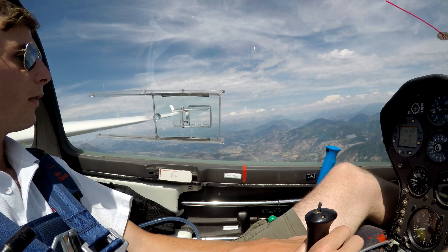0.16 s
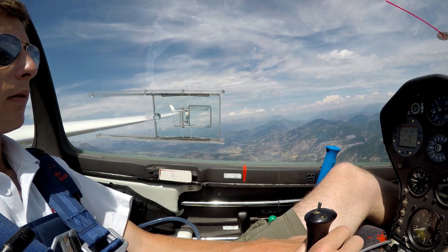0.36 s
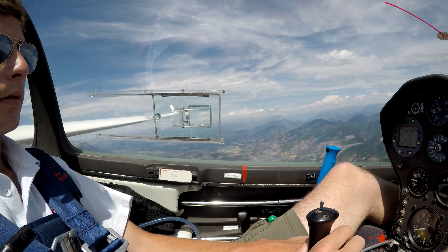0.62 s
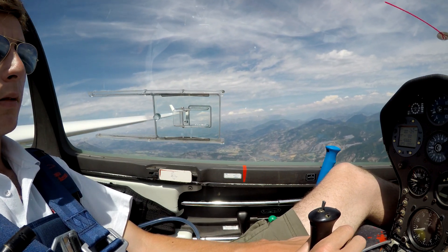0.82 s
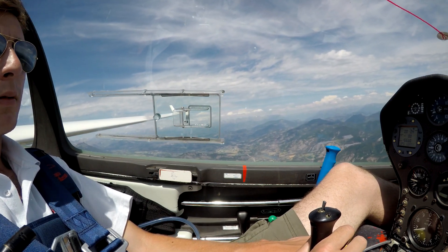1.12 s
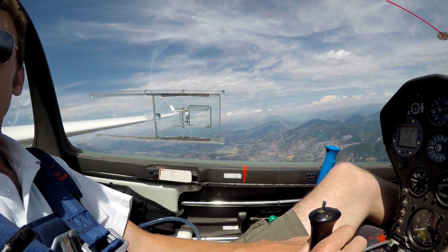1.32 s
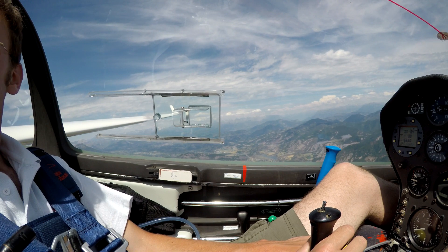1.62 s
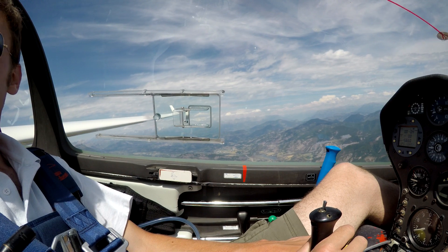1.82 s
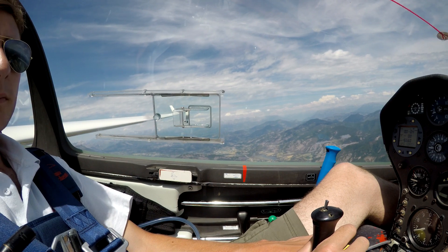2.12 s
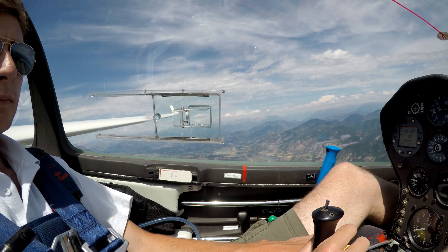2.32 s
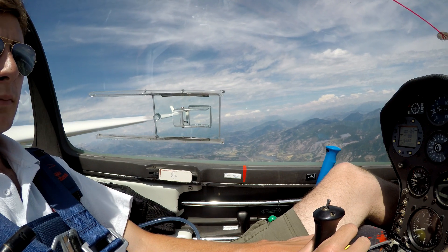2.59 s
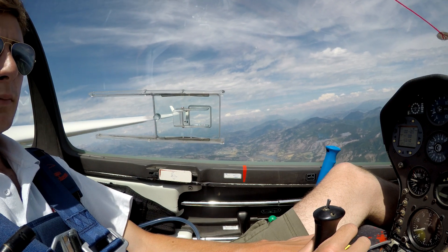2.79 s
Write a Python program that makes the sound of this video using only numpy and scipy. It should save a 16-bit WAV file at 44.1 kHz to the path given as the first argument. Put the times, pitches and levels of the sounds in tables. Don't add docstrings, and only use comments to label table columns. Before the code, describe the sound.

Deep, uneven wind rumble fills a glider cockpit in flight, with a softer airy roar and faint high hiss beneath; dull loose knocks come mostly early, then sporadically, heard close through a small enclosed microphone.

```python
import sys
import numpy as np
from scipy import signal
from scipy.io import wavfile
from scipy.ndimage import uniform_filter1d

SR = 44100
rng = np.random.default_rng(int(sys.argv[2]) if len(sys.argv) > 2 else 0)


def how_loud(loudness_db):
    steps = np.asarray(loudness_db, float) / 20
    return 10 ** steps


def wrap_up_sound(samples):
    columns = np.atleast_2d(samples).T
    tamed = np.clip(columns, -1, 1)
    steps = np.round(tamed * 32767).astype(np.int16)
    wavfile.write(sys.argv[1], SR, steps)


N = 130095

# time in seconds, level in dB.
FLOW_STRENGTH = [(0.0, -41.5), (0.73, -40), (2.09, -42), (2.56, -40.5), (2.95, -40)]
CONTACT_RISE_S = .0024


def rms_one(x):
    return x / np.sqrt(np.mean(x ** 2) + 1e-20)


def in_time(rows):
    return np.interp(np.arange(N) / SR, *np.transpose(rows))


def drift(rate_hz):
    hop = 40
    settle = 2000
    pole = np.exp(-2 * np.pi * rate_hz * hop / SR)
    white = rng.standard_normal(N // hop + 2 + settle)
    slow = signal.lfilter([1], [1, -2 * pole, pole * pole], white)[settle:]
    return np.interp(np.arange(N) / hop, np.arange(len(slow)), rms_one(slow - slow.mean()))


def band(x, low_hz, high_hz):
    return signal.sosfilt(signal.butter(2, [low_hz, high_hz], "band", fs=SR, output="sos"), x)


def turbulence(colour, shared_db, own_db, rate_hz):
    hz, db = np.transpose(colour)
    edges = 12 * 2 ** np.arange(0, 10.6, .25)
    white = rng.standard_normal((2, N + SR))
    together = drift(rate_hz)
    out = 0
    for k, (low, high) in enumerate(zip(edges, edges[1:])):
        mid = np.sqrt(low * high)
        if hz[0] / 1.2 < mid < hz[-1] * 1.2:
            colour_db = np.interp(np.log(mid), np.log(hz), db)
            gain_db = colour_db + shared_db * together + own_db * drift(rate_hz)
            out = out + how_loud(gain_db) * band(white[k % 2], low, high)[SR:]
    return rms_one(out)


def evened(x):
    return rms_one(x / np.sqrt(uniform_filter1d(x ** 2, size=3000) + 0.47))


def buffet():
    # time in seconds, level in dB.
    strength = [(0.0, -25), (0.13, -21.5), (0.19, -35), (0.22, -23), (0.29, -39), (0.44, -22.5),
                (0.97, -27.5), (1.01, -23), (1.95, -27), (2.0, -26), (2.06, -27), (2.3, -23), (2.34, -24),
                (2.37, -22), (2.46, -32.5), (2.49, -23), (2.91, -27), (2.95, -27)]
    # frequency in Hz, density in dB per Hz.
    colour = [(12, -4), (20, -4.5), (28, -2.5), (45, 0.5), (65, -5.5), (85, -15.5), (110, -33)]
    noise = evened(turbulence(colour, shared_db=-3.2, own_db=-2.0, rate_hz=1.4))
    return how_loud(in_time(strength) - 0.5) * noise


def shell_roar():
    # time in seconds, level in dB.
    shake = [(0.0, -36), (0.06, -30.5), (0.11, -27.5), (0.17, -37.5), (0.29, -26.5), (0.31, -34.5),
             (0.64, -30), (0.72, -33), (0.75, -31), (1.06, -30), (1.14, -30.5), (1.17, -29.5),
             (1.61, -32.5), (1.71, -25.5), (1.74, -31), (2.69, -30), (2.92, -36), (2.95, -41)]
    # frequency in Hz, density in dB per Hz.
    colour = [(75, -9), (100, -3.5), (140, 0.5), (200, -6), (300, -4.5), (400, -18.5)]
    noise = evened(turbulence(colour, shared_db=-1.9, own_db=0.9, rate_hz=13.0))
    return how_loud(in_time(shake) - 2.5) * noise


def flow_level(follows, above_db):
    flow_db = in_time(FLOW_STRENGTH)
    return flow_db.mean() + follows * (flow_db - flow_db.mean()) + above_db


def air_roar():
    # frequency in Hz, density in dB per Hz.
    colour = [(150, -9.5), (300, -8), (450, -10), (650, -12.5), (1000, -15), (1600, -22.5), (2600, -27),
              (3400, -38)]
    noise = turbulence(colour, shared_db=0.32, own_db=0.33, rate_hz=27.0)
    return how_loud(flow_level(follows=0.35, above_db=6.5)) * noise


def seal_hiss():
    # frequency in Hz, density in dB per Hz.
    colour = [(2500, -13), (3600, 3), (5000, -4.5), (6100, -4), (7000, -18.5), (9000, -16.5),
              (12000, -30.5), (15500, -32.5)]
    noise = turbulence(colour, shared_db=0.4, own_db=0.54, rate_hz=37.0)
    return how_loud(flow_level(follows=0.46, above_db=0.84)) * noise


def resonate(x, peaks):
    for hz, width_hz, db in peaks:
        a, w, g = np.pi * width_hz / SR, 2 * np.pi * hz / SR, how_loud(db / 2)
        zeros = [1 + a * g, -2 * np.cos(w), 1 - a * g]
        poles = [1 + a / g, -2 * np.cos(w), 1 - a / g]
        x = signal.lfilter(zeros, poles, x)
    return x


def cabin(x):
    # frequency in Hz, width in Hz, gain in dB.
    modes = [(124, 18, 5), (155.6, 9.2, 4.5), (206, 7.4, -2), (272, 70, 1.5), (484, 85, 3), (565, 78, -5),
             (672, 92, 8), (923, 41, 7.5), (1056, 12, 3), (1248, 21, -4), (1254, 89, 6.5), (1339, 29, -6),
             (1386, 28, 4.5), (1584, 54, 6)]
    return resonate(x, modes)


def swells(rows, turns, gain_db):
    out, phases = np.zeros(N + 2 * SR), rng.random(len(rows))
    for (s, db, hz), phase in zip(rows, phases):
        t = np.arange(int(turns / hz * SR)) / SR
        wave = np.hanning(len(t)) * np.sin(2 * np.pi * (phase + hz * t))
        i = SR + int(s * SR) - len(t) // 2
        out[i:i + len(t)] += how_loud(db + gain_db) * wave
    return out[SR:SR + N]


def shudders():
    # time in seconds, peak in dB, pitch in Hz.
    shell_swells = [(0.012, -26.5, 254), (0.021, -24.5, 138), (0.091, -25.5, 116), (0.109, -27.0, 214),
                    (0.124, -34, 97), (0.288, -23, 256), (0.372, -26.5, 89), (0.376, -23, 254),
                    (0.389, -29.0, 400), (0.561, -22.5, 100), (0.596, -27, 104), (0.631, -28, 396),
                    (0.805, -29.0, 194), (0.971, -29.0, 214), (1.009, -25.0, 159), (1.035, -29, 266),
                    (1.071, -26.5, 187), (1.187, -24, 164), (1.239, -24.5, 280), (1.271, -27, 117),
                    (1.297, -23, 261), (1.386, -25.5, 264), (1.442, -34, 330), (1.655, -24.5, 261),
                    (1.705, -21, 197), (1.706, -27, 95), (1.751, -27, 197), (1.783, -27.5, 233),
                    (1.853, -28.0, 104), (1.979, -24.5, 165), (2.169, -31, 251), (2.175, -23, 153),
                    (2.217, -29, 161), (2.288, -24.5, 158), (2.324, -24.5, 161), (2.417, -24, 181),
                    (2.419, -23.5, 345), (2.456, -23.5, 230), (2.561, -27, 241), (2.607, -27.5, 244),
                    (2.672, -23.0, 254), (2.731, -25.5, 263), (2.846, -28.0, 356)]
    return swells(shell_swells, turns=6.06, gain_db=0.5)


def lumps():
    # time in seconds, peak in dB, pitch in Hz.
    heavy = [(0.042, -29.0, 80), (0.116, -17, 41), (0.454, -18, 24.1), (0.468, -23, 80), (0.582, -27, 31),
             (0.63, -33, 80.4), (0.94, -30, 80), (1.089, -20.5, 57), (1.152, -21.5, 32), (1.313, -16.5, 68),
             (1.483, -25, 31), (1.637, -23.5, 50), (1.69, -18, 57), (1.799, -18.5, 58.3),
             (1.847, -20, 24.4), (1.894, -25, 40.7), (1.969, -17, 24), (2.006, -15, 38), (2.217, -20, 57),
             (2.277, -15.5, 32), (2.533, -25, 55.3), (2.59, -17, 30), (2.708, -27, 80), (2.751, -29, 55.6),
             (2.806, -21.5, 66.3)]
    return swells(heavy, turns=4.11, gain_db=0.5)


def bursts(times, dbs, low_hz, high_hz, t60_s):
    out, t = np.zeros(N + SR), np.arange(SR // 10) / SR
    shape = (1 - np.exp(-t / CONTACT_RISE_S)) * how_loud(-60 * t / t60_s)
    noises = rng.standard_normal((len(times), len(t)))
    for s, db, noise in zip(times, dbs, noises):
        puff = band(band(noise * shape, low_hz, high_hz), low_hz / 1.3, high_hz * 1.2)
        i = int(s * SR)
        out[i:i + len(t)] += how_loud(db) * puff / np.abs(puff).max()
    return out[:N]


def struck(hz, t60_s, phase):
    t = np.arange(SR // 10) / SR
    rise = 1 - np.exp(-(t / CONTACT_RISE_S) ** 2)
    return np.sin(2 * np.pi * (phase + hz * t)) * rise * how_loud(-60 * t / t60_s)


def knocks():
    # time in seconds, peak in dB, panel pitch in Hz,
    # thump in dB re the peak, click in dB re the peak.
    contacts = [(.28, -19.5, 790, -6, -18), (.2905, -26, 860, -9, -18), (.368, -19.5, 820, -9, -15),
                (.6225, -17.5, 860, -1, -14), (.734, -28, 690, -5, -20), (1.067, -28.5, 900, -8, -16),
                (1.183, -28.5, 880, -4, -18), (1.28, -27, 880, -4, -19), (1.296, -28, 780, -6, -19),
                (1.351, -27, 770, -5, -19), (1.697, -21.5, 720, -3, -20), (1.708, -26, 850, -2, -20),
                (1.859, -30, 650, -4, -18), (2.449, -20, 880, -3, -15), (2.476, -29, 750, -6, -18),
                (2.553, -26, 720, -3, -15), (2.665, -25, 690, -4, -16), (2.675, -26, 800, -6, -19)]
    # lag in seconds, pitch as a ratio to the panel pitch, level in dB.
    panel = [(0, 1.0, 0), (0, .8, -2), (0, 1.14, -6), (.001, .6, -3), (.003, .42, -3), (.0105, .95, -10)]
    lead_s, crest_s, scatter_turns = .001, .0035, .2
    s, db, hz, thump_db, click_db = np.transpose(contacts)
    out, chances = np.zeros(N + SR), rng.random((len(s), len(panel) + 2))
    for start, peak_db, panel_hz, low_db, chance in zip(s - lead_s, db + .3, hz, thump_db, chances):
        rings = []
        for (lag, ratio, gain_db), scatter in zip(panel, chance[2:]):
            mode_hz = panel_hz * ratio
            phase = .25 - mode_hz * crest_s + scatter_turns * scatter
            rings.append((lag, gain_db, struck(mode_hz, .036, phase)))
        thump = struck(196 * (0.757 + 0.61 * chance[0]), 0.025, chance[1])
        rings.append((0.00495, low_db + 6.5, thump))
        for lag, gain_db, wave in rings:
            i = int((start + lag) * SR)
            out[i:i + len(wave)] += how_loud(peak_db + gain_db) * wave
    rattle = bursts(s, db + click_db + 6.5, low_hz=950, high_hz=3000, t60_s=.045)
    click = bursts(s, db + click_db + 4.5, low_hz=1100, high_hz=6200, t60_s=.03)
    return out[:N] + rattle + click


def seal_ticks():
    # time in seconds, peak in dB.
    slips = [(0.9832, -38.5), (2.45, -40), (2.667, -39.5), (2.7494, -42), (2.834, -42)]
    s, db = np.transpose(slips)
    return bursts(s, db, low_hz=5200, high_hz=8160, t60_s=0.0091)


def scene():
    air = buffet() + shell_roar() + air_roar() + seal_hiss()
    inside = cabin(air + seal_ticks())
    return (inside + shudders() + lumps() + knocks())[None]


def band_limit(x):
    return signal.sosfilt(signal.butter(12, 15160, fs=SR, output="sos"), x)


def record(dry):
    # frequency in Hz, width in Hz, gain in dB.
    housing = [(2133, 300, 3), (2500, 190, -0.5), (2937, 104, 5.5), (3245, 690, -6), (3567, 36, 10.5),
               (3770, 210, 3.5), (3920, 48, 1.5), (5910, 220, 3.5), (6330, 93, 3.5), (7300, 930, -6),
               (8150, 220, 0), (12200, 900, 0.5), (13200, 400, 6)]
    low_pass = signal.cheby2(12, 40, 15380, fs=SR, output="sos")
    mix = signal.sosfilt(low_pass, resonate(dry, housing))
    return band_limit(mix)


dry = scene()
out = record(dry)
wrap_up_sound(out)
```